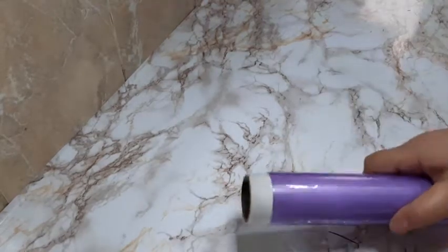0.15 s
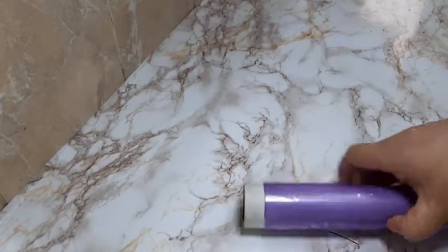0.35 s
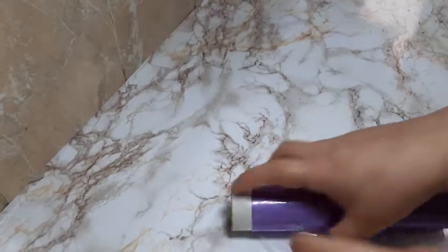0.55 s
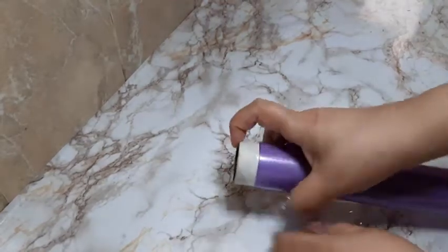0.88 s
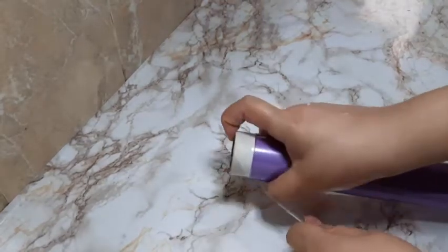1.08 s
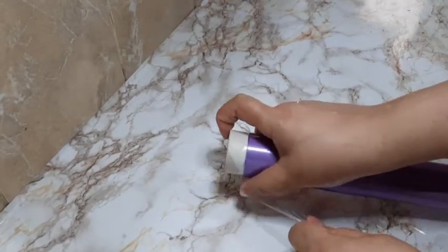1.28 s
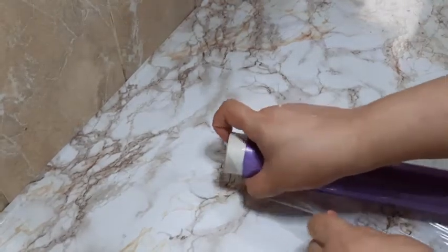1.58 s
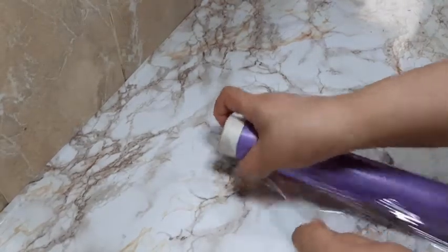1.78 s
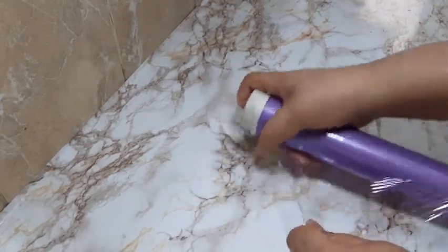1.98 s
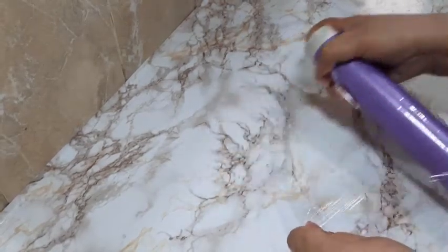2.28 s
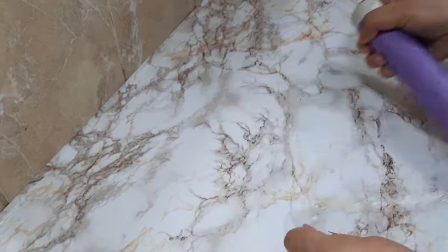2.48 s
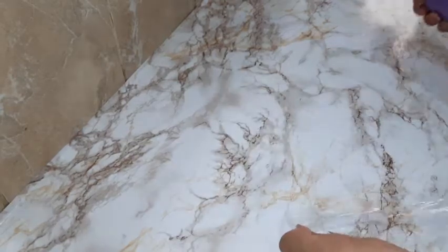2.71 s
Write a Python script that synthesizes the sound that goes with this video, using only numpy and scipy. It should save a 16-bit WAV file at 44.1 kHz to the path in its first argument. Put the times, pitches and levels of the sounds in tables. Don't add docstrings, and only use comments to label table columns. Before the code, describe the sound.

Cling film is handled and peeled from its cardboard roll: hollow bumps and one sharp crack on a stone counter, faint finger ticks, then two crackling pulls, close stereo microphone in a small hard kitchen.

```python
import sys
import numpy as np
from scipy import signal
from scipy.fft import rfft, irfft
from scipy.io import wavfile

SR = 44100
rng = np.random.default_rng(int(sys.argv[2]) if len(sys.argv) > 2 else 0)


def to_wav(s):
    ch = np.atleast_2d(s).T
    pcm = np.round(np.clip(ch, -1, 1) * 32767)
    wavfile.write(sys.argv[1], SR, pcm.astype(np.int16))


def convert_level_to_amplitude(level_db):
    exponent = np.asarray(level_db, float) / 20
    return 10 ** exponent


N = 125685

# f/Hz, level per Hz/dB
FLOOR_SPECTRUM = [(30, 11), (100, -5), (250, -16), (2000, -24), (15500, -30)]
# f/Hz, left-right correlation
PORT_LIKENESS = [(60, 0.77), (150, 0.87), (300, 1), (700, 0.2), (1500, -0.13), (3000, -0.11), (7000, 0.52)]
# f/Hz, left over right/dB
PORT_BALANCE = [(60, 1.5), (150, 1.5), (330, -2.5), (600, 2.5), (1400, 2.5), (3000, 0.5), (6000, 0)]
# f/Hz, t60/s
ROOM_T60 = [(100, .22), (300, .24), (1400, .29), (3700, .28), (9700, .2), (15000, .15)]
# f/Hz, level/dB
ROOM_TONE = [(100, -5.5), (500, 5.5), (2000, 2), (15000, 0)]
# t/s, peak
# level/dB, contact cut-off f/Hz, counter boom level/dB
KNOCKS = [(0.118, -13, 300, -23.5), (.190, -13.5, 320, -23.5), (0.241, -16.5, 360, -33),
          (0.284, -18.5, 560, -31), (.316, -19, 480, -23.5), (.3465, -14.5, 2470, -13.5),
          (0.36, -21.5, 1475, -25), (.377, -14, 1500, -26), (.387, -17, 1280, -34.5),
          (0.404, -23.5, 920, -25), (0.463, -52, 308.5, -26.5), (1.484, -20, 520, -60),
          (1.768, -41.5, 920, -64), (1.931, -43, 500, -65), (1.946, -38.5, 500, -54),
          (1.966, -45.5, 890, -65), (2.113, -20, 397, -33.5), (2.158, -34, 308, -29.5),
          (2.274, -57, 300, -32.5), (2.387, -24, 600, -36.5)]
# f/Hz, level/dB, t60/s
TUBE_MODES = [(184, -6, .06), (240, -9, .06), (330, -5, .085), (368, -8, .075), (440, -10, .06),
              (608, -5, .08), (757, -7, .07), (990, -20, .06), (1340, -14, .06)]
# t/s, peak level/dB
EDGE_CRACKS = [
    (.3435, -32),
    (.3462, -9.5),
    (.3473, 1),
    (.3478, -8.5),
    (.3484, -3),
    (0.3496, -8.5),
    (.3498, -8),
    (.3525, -13.5),
    (.3745, -23),
    (.3775, -15.5),
]
# f/Hz, level/dB
CRACK_COLOUR = [(300, 15.5), (1000, 9.5), (2500, 14), (5000, 5), (9000, -0.5), (15000, -8)]
# t/s, level/dB
CRINKLE_LEVEL = [(0, -48), (.04, -63), (.09, -58.5), (.28, -61), (.288, -48.5), (.5, -60.5), (.66, -68),
                 (.72, -55), (1.08, -59.5), (1.27, -68), (1.3, -105), (1.56, -54.5), (1.68, -58),
                 (1.8, -49), (1.92, -55), (2.0, -58), (2.7, -63.5), (2.85, -68)]
# t/s, level over the crinkle/dB
ROLL_RUSTLE = [(0, -15), (.6, -5.5), (.85, -7.5), (.95, -25), (1.45, -26), (1.52, -5.5), (1.92, -8),
               (2.05, -3), (2.85, -11.5)]
# t/s, peak level/dB, ring f/Hz
TICKS = [(.17, -53, 6500), (.283, -43, 1930), (0.6027, -54.5, 6020), (0.626, -55, 6030), (0.678, -44, 1935),
         (0.7215, -41.5, 2145), (0.7438, -39.5, 1300), (0.7827, -39.5, 1830), (.826, -49, 2000),
         (0.8307, -38.5, 1340), (0.9053, -40, 3000), (0.919, -31, 1336), (0.923, -38, 1500),
         (0.930, -40.5, 2700), (0.9794, -38.5, 1090), (1.0185, -33, 1390), (1.032, -40, 5020),
         (1.041, -39.5, 3030), (1.0506, -34.5, 2610), (1.069, -46, 6140), (1.1057, -45, 1750),
         (1.1133, -35.5, 2500), (1.1411, -36, 2560), (1.16, -43, 2990), (1.174, -36, 2400),
         (1.1752, -25.5, 2400), (1.2238, -39.5, 3000), (1.2385, -38, 2520), (1.249, -50.5, 2485),
         (1.2674, -44, 3630), (1.282, -21, 1480), (1.284, -24.5, 1460), (1.7466, -38.5, 1800),
         (1.8865, -34, 3000), (1.9178, -34.5, 5500), (1.924, -47, 5500), (1.94, -29, 5100),
         (2.7297, -34, 1316)]
# t/s, peak level/dB, ring level/dB, ring f/Hz
SNAPS = [(1.484, -6, -29, 1840), (1.767, -15, -23, 910), (1.927, -39, -6, 1520), (1.943, -23.5, -13, 1510),
         (1.964, -21, -29, 2240), (1.9658, -8.5, -36, 2120), (1.9682, -28.5, -36, 2080),
         (2.0519, -31.5, -10, 1860), (2.0834, -26, -10.5, 1280), (2.1004, -12, -12, 2520),
         (2.105, -16, -9, 585), (2.118, -11, -16.5, 1230), (2.2, -15, -9, 1730), (2.226, -23.5, -6, 600),
         (2.2664, -12.5, -15, 1330), (2.2677, -17, -1.5, 1330), (2.274, -12.5, -8.5, 1360),
         (2.2778, -19, -12, 1360), (2.345, -18.5, -9, 2610), (2.388, -5, -11.5, 1366),
         (2.3897, -7, -8.5, 1300), (2.4026, -10, -8, 1280), (2.4257, -15.5, -0.5, 1350),
         (2.4351, -10, -10.5, 1310), (2.4694, -9, -10.5, 844), (2.4895, -16.5, -7, 600),
         (2.5013, -16.5, -23, 3000), (2.54, -29.5, 1.5, 640)]
# t/s, level/dB
EARLIER_PULL = [(0, -42), (.04, -53.5), (.06, -63)]
# t/s, level/dB
TUG = [(1.914, -61), (1.927, -46), (1.936, -50), (1.945, -39.5), (1.952, -65), (1.964, -57), (1.99, -68)]
# t/s, level/dB
FIRST_PULL = [(2.082, -41), (2.094, -35.5), (2.10, -30.5), (2.14, -32.5), (2.19, -28), (2.2, -31),
              (2.24, -25), (2.262, -33.5), (2.28, -29), (2.3, -39.5), (2.355, -36.5), (2.365, -35)]
# t/s, level/dB
SECOND_PULL = [(2.386, -51), (2.389, -21.5), (2.41, -46), (2.43, -27), (2.48, -27), (2.52, -32),
               (2.57, -30), (2.6, -47.5), (2.66, -74)]
# f/Hz, width/Hz, level/dB
SHEET_MODES = [(350.6, 91, -6.5), (600, 200, 2), (1127, 250, 3.5), (1350, 51, 7), (1750, 67, 1),
               (2400, 220, -32), (3070, 370, -20.5)]
# t/s, tilt/dB per octave down
SLACK = [(0, 3.5), (1.92, 2), (1.95, 11), (2.1, -0.5), (2.18, 3.5), (2.21, -7.5), (2.23, 2.5), (2.27, -1),
         (2.351, -3), (2.39, 5.5), (2.45, -2.5), (2.49, 0), (2.52, 0.5), (2.56, 1.5), (2.619, -6.5)]
# f/Hz, level/dB
FILM_COLOUR = [(80, -61.5), (900, -6), (2000, 7), (4000, 2), (6500, 2.5), (8500, 3), (9700, -2), (13000, 3)]

FFT_SIZE = 131072
FFT_HZ = np.maximum(np.arange(FFT_SIZE // 2 + 1) * SR / FFT_SIZE, 10)
FLOOR_DB = -69
ROOM_DB, ROOM_DELAY_S, ROOM_LOW_HZ = -37, .0012, 133
EARLY_DB, EARLY_S = 4, .008
PATCH_SHIFTS_PER_S, BODY_SHIFTS_PER_S = 400, 6
BOOM_HZ, BOOM_SIDE_HZ, BOOM_LAG_S, BOOM_RISE_S = 98, 110, .0054, .007
BOOM_DB, BOOM_T60_S, BOOM_TAIL_DB, BOOM_TAIL_T60_S = 9.5, .13, -26, .7
CRINKLES_PER_S, SLIPS_PER_S = 1100, 3300
GRAIN_SPREAD_DB, CLUMP_DB, CLUMPS_PER_S = 3.0, 2.06, 27
SNAP_LAG_S, AFTER_SLIP_DB, AFTER_SLIP_S = .00083, -31, .00056
TICK_RING_DB, SNAP_RING_DB, RING_T60_S = -23, -7.5, .025
MIC_LOW_HZ, MIC_TOP_HZ = 73, 15800


def rms_one(x):
    return x / np.sqrt(np.mean(x ** 2) + 1e-20)


def in_time(rows):
    s, db = np.transpose(rows)
    return convert_level_to_amplitude(np.interp(np.arange(N) / SR, s, db, -120, -120))


def at_hz(points, hz):
    f, value = np.transpose(points)
    return np.interp(np.log(hz), np.log(f), value)


def colour(x, points):
    cepstrum = irfft(at_hz(points, FFT_HZ) * np.log(10) / 20)
    half = FFT_SIZE // 2
    cepstrum[1:half] *= 2
    cepstrum[half + 1:] = 0
    return irfft(rfft(x, FFT_SIZE) * np.exp(rfft(cepstrum)))[..., :N]


def drift(rate):
    r = np.exp(-2 * np.pi * rate / SR)
    noise = rng.standard_normal(N + SR)
    return rms_one(signal.lfilter([1], [1, -2 * r, r * r], noise)[SR:])


def resonate(x, hz, width_hz):
    r = np.exp(-np.pi * width_hz / SR)
    poles = [1, -2 * r * np.cos(2 * np.pi * hz / SR), r * r]
    return signal.lfilter([(1 - r * r) / 2, 0, (r * r - 1) / 2], poles, x + 1e-18)


def grains(rate):
    size_db = GRAIN_SPREAD_DB * np.minimum(rng.exponential(1, N), 4) + CLUMP_DB * drift(CLUMPS_PER_S)
    sizes = convert_level_to_amplitude(size_db) * rng.choice([-1, 1], N)
    return rms_one(sizes * (rng.random(N) < rate / SR))


def stereo_bands(length, gain_of_band):
    out, edges = 0, 30 * 2 ** np.arange(0, 9.6, .5)
    white = rng.standard_normal((2, 2, length))
    for k, (lo, hi) in enumerate(zip(edges, edges[1:])):
        band = signal.butter(2, [lo, min(hi, 21000)], "band", fs=SR, output="sos")
        mid, side = signal.sosfilt(band, white[k % 2])
        hz = np.sqrt(lo * hi)
        alike = np.clip(at_hz(PORT_LIKENESS, hz), -1, 1)
        pair = np.sqrt(1 + alike) * mid + np.sqrt(1 - alike) * side * [[1], [-1]]
        out = out + gain_of_band(hz) * pair
    return out


def background_floor():
    noise = stereo_bands(N, lambda hz: convert_level_to_amplitude(at_hz(FLOOR_SPECTRUM, hz)))
    return convert_level_to_amplitude(FLOOR_DB) * rms_one(noise)


def kitchen(clicks, body):
    t = np.arange(SR // 2) / SR
    low_cut = signal.butter(2, ROOM_LOW_HZ, "high", fs=SR, output="sos")
    shape = (t > ROOM_DELAY_S) * (1 + convert_level_to_amplitude(EARLY_DB) * np.exp(-t / EARLY_S))
    rates = (PATCH_SHIFTS_PER_S, BODY_SHIFTS_PER_S)
    spots = np.array([[drift(rate) for _ in range(4)] for rate in rates])
    spots = spots / np.linalg.norm(spots, axis=1, keepdims=True)
    out = 0
    for fast, slow in zip(*spots):
        decay = stereo_bands(len(t), lambda hz: convert_level_to_amplitude(at_hz(ROOM_TONE, hz) - 60 * t / at_hz(ROOM_T60, hz)))
        source = signal.sosfilt(low_cut, fast * clicks + slow * body)
        out = out + signal.fftconvolve(source[None], decay * shape, axes=1)[:, :N]
    return convert_level_to_amplitude(ROOM_DB) * out


def counter_boom():
    boom, t = np.zeros(N + SR), np.arange(SR // 2) / SR
    decay = convert_level_to_amplitude(BOOM_DB - 60 * t / BOOM_T60_S) + convert_level_to_amplitude(BOOM_TAIL_DB - 60 * t / BOOM_TAIL_T60_S)
    swell = (1 - np.exp(-t / BOOM_RISE_S)) ** 2 * decay
    for s, _, _, boom_db in KNOCKS:
        side = np.sin(2 * np.pi * BOOM_SIDE_HZ * t + rng.normal(0, 3.0))
        ring = np.sin(2 * np.pi * BOOM_HZ * t) + 0.084 * side
        i = int((s + BOOM_LAG_S) * SR)
        boom[i:i + len(t)] += convert_level_to_amplitude(boom_db) * swell * ring
    return boom[:N]


def cardboard_tube():
    out = 0
    for hz, mode_db, t60 in TUBE_MODES:
        push = np.zeros(N)
        for s, db, cut_hz, _ in KNOCKS:
            luck = rng.normal(0, 3.0)
            push[int(s * SR + abs(luck) * 8)] += convert_level_to_amplitude(db + luck) / (1 + (hz / cut_hz) ** 2) ** 3
        r, w = convert_level_to_amplitude(-60 / (t60 * SR)), 2 * np.pi * hz / SR
        ring = signal.lfilter([0, np.sin(w)], [1, -2 * r * np.cos(w), r * r], push + 1e-18)
        out = out + convert_level_to_amplitude(mode_db) * ring
    return signal.sosfilt(signal.butter(2, 170, "high", fs=SR, output="sos"), out)


def edge_cracks():
    crack, t = np.zeros(N), np.arange(40)
    for s, db in EDGE_CRACKS:
        i = int(s * SR)
        crack[i:i + 40] += convert_level_to_amplitude(db + 2.0) * rng.standard_normal(40) * np.exp(-t / 5.0)
    return colour(crack, CRACK_COLOUR)


def idle_film():
    idle = grains(CRINKLES_PER_S) * in_time(CRINKLE_LEVEL)
    rustle = convert_level_to_amplitude(9.0) * in_time(ROLL_RUSTLE) * idle
    rustle = resonate(resonate(rustle, 480, 600), 480, 600)
    sheet = resonate(resonate(convert_level_to_amplitude(2.0) * idle, 1400, 900), 1500, 1400)
    return colour(idle, FILM_COLOUR) + rustle + sheet


def snaps():
    bright, low, t = np.zeros(N), np.zeros(N + SR), np.arange(2000) / SR
    rows = [(s, db, TICK_RING_DB, hz) for s, db, hz in TICKS]
    rows += [(s, db, ring_db + SNAP_RING_DB, hz) for s, db, ring_db, hz in SNAPS]
    for s, db, ring_db, hz in rows:
        noise, first = rng.standard_normal(2000), t == 0
        burst = first + convert_level_to_amplitude(AFTER_SLIP_DB) * noise ** 3 * np.exp(-t / AFTER_SLIP_S)
        burst = burst + resonate(burst, 6000 * np.exp(.08 * rng.standard_normal()), 3500)
        i = int((s + SNAP_LAG_S) * SR)
        bright[i:i + 2000] += convert_level_to_amplitude(db + 9.0) * burst / np.abs(burst).max()
        ring = resonate(resonate(noise + 30 * first, hz, 0.56 * hz), hz, 0.26 * hz)
        low[i:i + 2000] += convert_level_to_amplitude(db + ring_db) * rms_one(ring) * convert_level_to_amplitude(-60 * t / RING_T60_S)
    return colour(bright, FILM_COLOUR), low[:N]


def taut_sheet(x):
    slack = np.interp(np.arange(N) / SR, *np.transpose(SLACK))
    out = 0
    for k, (hz, width_hz, db) in enumerate(SHEET_MODES):
        gain = convert_level_to_amplitude(db + slack * np.log2(1000 / hz) + 0.57 * drift(7.2))
        out = out + resonate(x * gain, hz, width_hz) * (-1) ** k
    return out


def peeling_film():
    force = in_time(FIRST_PULL) + in_time(SECOND_PULL) + in_time(EARLIER_PULL) + in_time(TUG)
    slips = grains(SLIPS_PER_S) * force
    hiss = colour(convert_level_to_amplitude(1) * slips, FILM_COLOUR)
    shake = resonate(convert_level_to_amplitude(6.5) * slips, 58, 150.0)
    return hiss + shake + taut_sheet(convert_level_to_amplitude(8.0) * slips)


def scene():
    body, crack = counter_boom() + cardboard_tube(), edge_cracks()
    clicks, rings = snaps()
    peel = idle_film() + peeling_film()
    near = crack + clicks + rings + peel
    lag = np.round(2.0 * drift(24) * [[1], [-1]])
    ports = np.array([np.interp(np.arange(N) - d, np.arange(N), near) for d in lag])
    room = kitchen(crack + clicks, convert_level_to_amplitude(-0.5) * body + rings + peel)
    return ports + convert_level_to_amplitude(-1.5) * body + room + background_floor()


def roll_off(x):
    return signal.sosfilt(signal.butter(12, 16980, fs=SR, output="sos"), x)


def record(dry):
    tilts = [[(hz, sign * db / 2) for hz, db in PORT_BALANCE] for sign in (1, -1)]
    x = np.array([colour(port, tilt) for port, tilt in zip(dry, tilts)])
    x = .8 * np.tanh(x / .8)
    x = signal.sosfilt(signal.cheby2(12, 35, MIC_TOP_HZ * 1.02, fs=SR, output="sos"), x)
    x = signal.sosfilt(signal.butter(3, MIC_LOW_HZ, "high", fs=SR, output="sos"), x)
    return roll_off(x)


dry = scene()
out = record(dry)
to_wav(out)
```